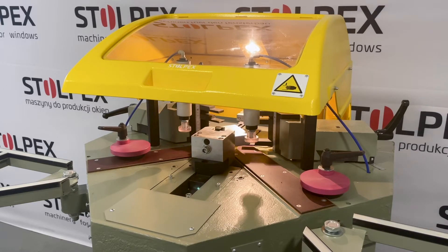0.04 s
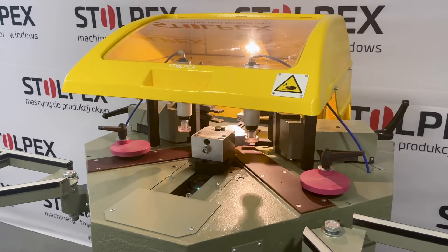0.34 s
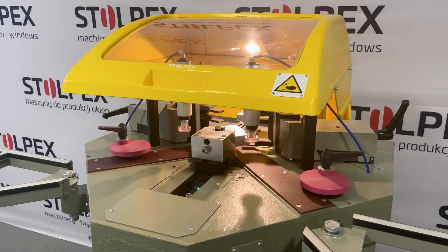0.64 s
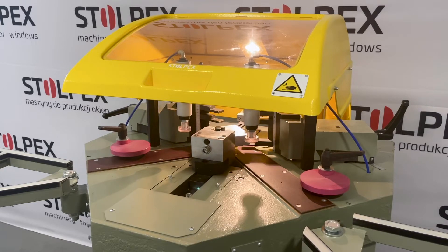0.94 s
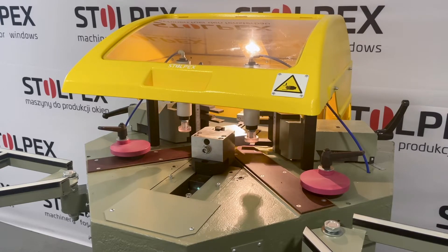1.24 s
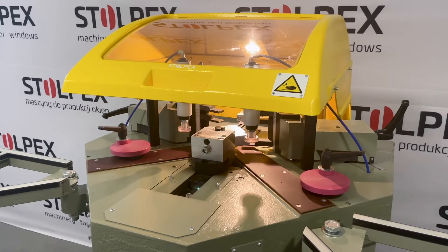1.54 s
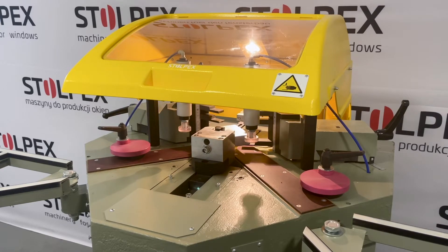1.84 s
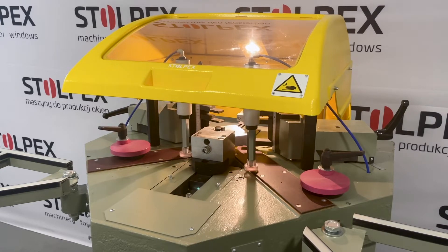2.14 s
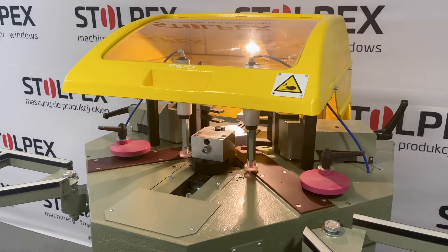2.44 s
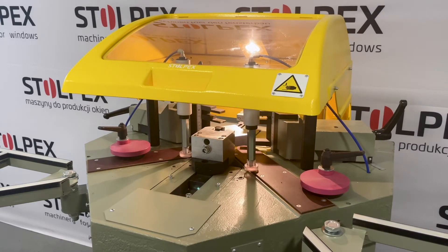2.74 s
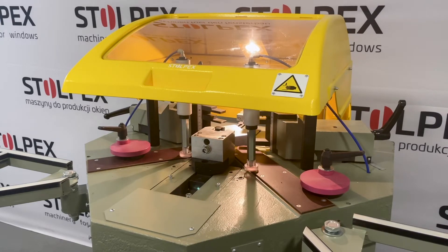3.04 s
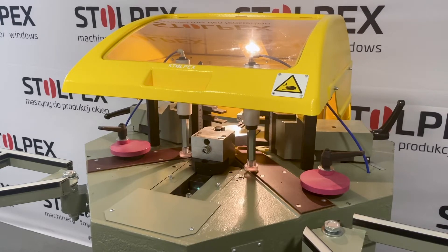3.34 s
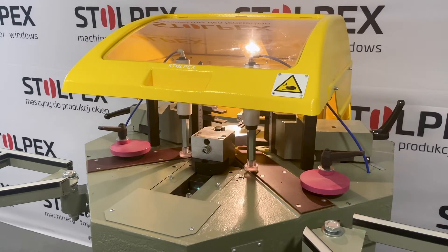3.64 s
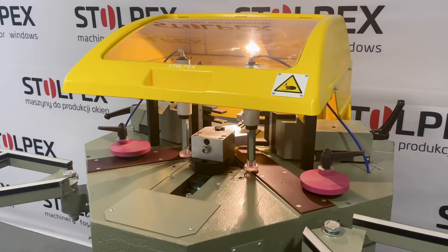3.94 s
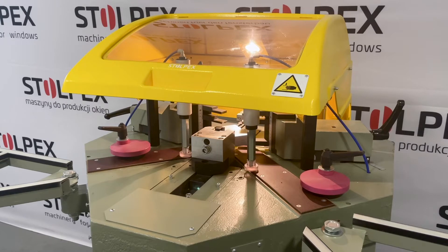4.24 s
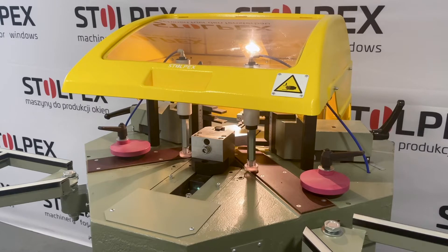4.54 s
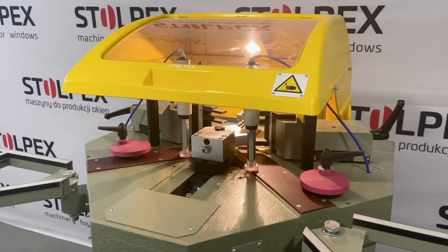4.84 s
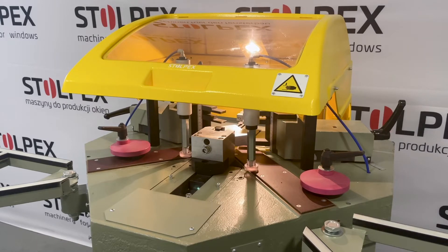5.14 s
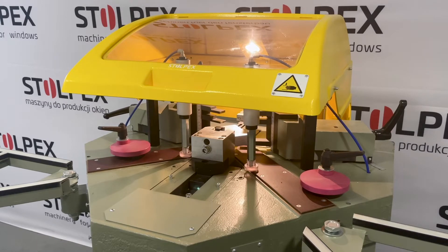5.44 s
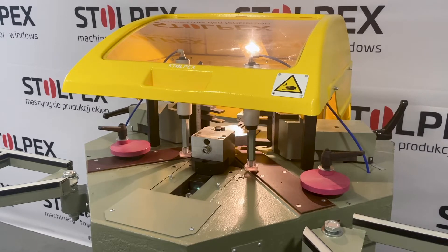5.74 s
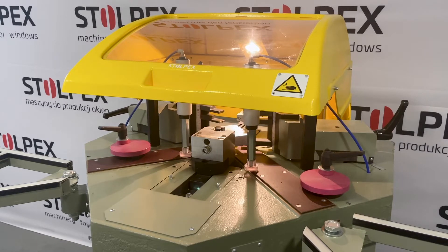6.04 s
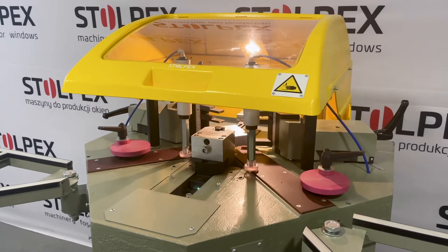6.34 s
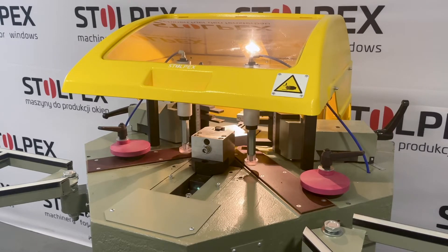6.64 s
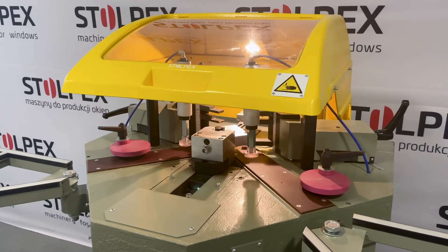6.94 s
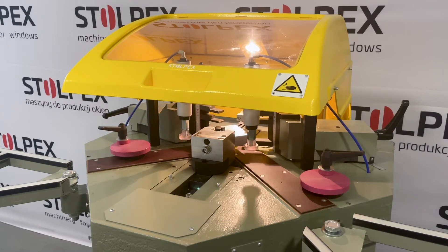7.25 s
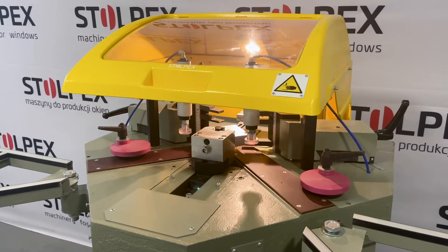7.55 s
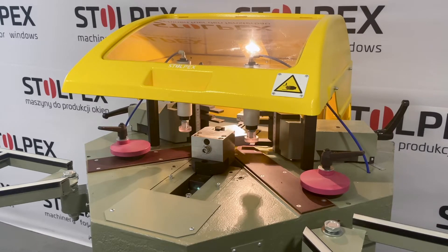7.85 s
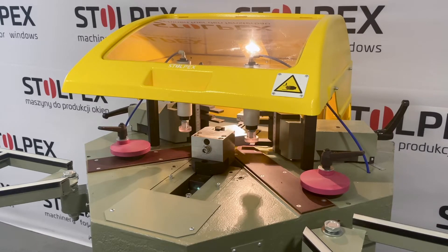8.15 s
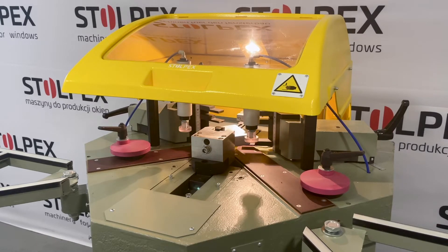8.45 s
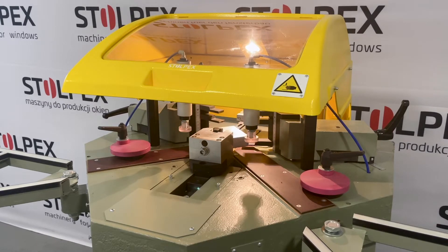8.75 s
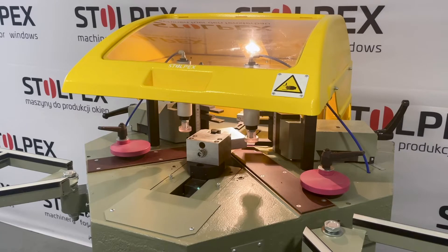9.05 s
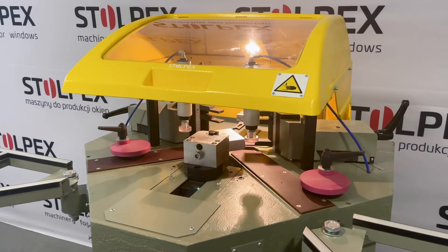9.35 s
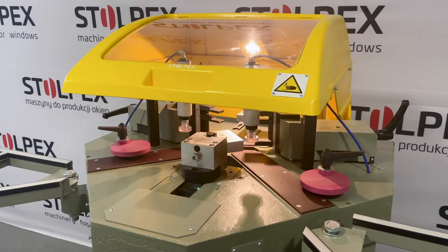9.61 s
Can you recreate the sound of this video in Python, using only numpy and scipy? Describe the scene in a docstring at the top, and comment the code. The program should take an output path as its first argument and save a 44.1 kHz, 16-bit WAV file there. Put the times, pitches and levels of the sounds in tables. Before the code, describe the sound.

An air-powered crimping machine runs one cycle, heard from a step away in a slightly echoing room, over a faint low hum. Soft metal sliding and a knock come around 1 second, then valve clicks. At 1.7 seconds a heavy clunk starts a loud blast of hissing air, which steps down at 2.7 and fades from about 3.4 seconds. After a short lull, a click and another clunk at 4.7 seconds launch a brighter, sizzling blast lasting about a second. At 5.8 seconds a jolt and a sharp puff lead into a softer, thin, high hiss that dies away past 7 seconds. A soft thud follows at 7.7. Around 8.2 seconds a valve clicks and a smaller clunk comes with a short burst of air. Steel slides faintly, with a light clack at 9 seconds and a weaker one at 9.4.

```python
"""An air-powered corner crimping machine

One cycle in a showroom, heard from a step away: clamps down, crimp, release, clamps up, stop back.
Valves click, then cylinders start with a clunk and let out their air in long hissing blasts.
Clamps and knives work in pairs, so their hiss steps down when the first cylinder reaches its end.
Metal parts knock and slide between the blasts; a low hum and a faint hiss lie under it all."""
import sys
import numpy as np
from scipy import signal
from scipy.fft import rfft, irfft, next_fast_len
from scipy.io import wavfile

SR = 44100
rng = np.random.default_rng(int(sys.argv[2]) if len(sys.argv) > 2 else 0)


def waveform_to_disk(signal):
    """Save audio, clipped to [-1, 1], as 16-bit WAV at the path in sys.argv[1]."""
    frames = np.transpose(np.atleast_2d(signal))
    scaled = np.clip(frames, -1, 1) * 32767
    samples = np.round(scaled).astype(np.int16)
    wavfile.write(sys.argv[1], SR, samples)


N = 426888
TIME = np.arange(N) / SR
SIZE = next_fast_len(N + SR)   # a spare second leaves room for the echo
HZ = np.maximum(np.arange(SIZE // 2 + 1) * SR / SIZE, 1)
CUTOFF_HZ = 15800


def from_db(db):
    """Turn decibels into a gain to multiply by."""
    return 10 ** (np.asarray(db) / 20)


def at_hz(points, hz=HZ):
    """Read a table between its rows, with every octave equally wide."""
    pitches, values = np.transpose(points)
    return np.interp(np.log(hz), np.log(pitches), values)


def unit_power(x):
    """Scale a signal to an average power of one."""
    return x / np.sqrt(np.mean(x ** 2) + 1e-30)


def boosts(resonances):
    """How many decibels a set of resonances adds at each pitch."""
    return sum(db / (1 + (2 * (HZ - hz) / width) ** 2) for hz, width, db in resonances)


# How alike left and right are (1 the same, -1 opposite): pitch_hz, likeness
LIKENESS = [(130, .97), (200, .88), (330, .6), (900, .65), (1400, .35), (4000, .55), (6300, .52),
            (7100, -.1), (7700, -1), (8800, -1), (9200, -.4), (10000, .1), (10700, 1), (12500, 1),
            (13200, -.1), (14100, -1)]
# How much louder the left side is: pitch_hz, left_minus_right_db
BALANCE = [(100, 1.7), (500, 1.3), (1400, 0), (2500, 2.8), (5200, 4), (7000, 1), (7700, 0)]
def stereo_spectrum(colour_db):
    """Noise spectrum for left and right, which in the treble turn alike, then opposite, band by band."""
    middle, side = rfft(rng.standard_normal((2, SIZE)))
    alike = np.clip(at_hz(LIKENESS), -1, 1)
    sign = np.array([[1], [-1]])
    pair = np.sqrt(1 + alike) * middle + np.sqrt(1 - alike) * side * sign
    return pair * from_db(colour_db + sign * at_hz(BALANCE) / 2) * (HZ < CUTOFF_HZ)


def noise(colour, resonances=()):
    """Stereo noise; its colour says how strong each pitch is compared with the others."""
    spectrum = stereo_spectrum(at_hz(colour) + boosts(resonances))
    return unit_power(irfft(spectrum)[:, :N])


def held(start_s, length_s, level_db, rise_s, fade_s, surge_db=0, settle_s=0.33):
    """A gain that rises, settles and dies away. Everywhere, fade_s is the time to fall by 60 dB."""
    age = np.maximum(TIME - start_s, 0)
    fade_db = np.minimum(60 * np.maximum(age - length_s, 0) / fade_s, 200)
    onset = 1 - np.exp(-age / rise_s)
    return onset * from_db(level_db + surge_db * np.exp(-age / settle_s) - fade_db)


def blow(start_s, level_db, rise_s, fade_s):
    """The gain of one blow, which builds up and dies at once."""
    fade_db = np.clip(60 * (TIME - start_s - rise_s) / fade_s, 0, 200)
    return np.clip((TIME - start_s) / rise_s, 0, 1) * from_db(level_db - fade_db)


def one_second(start_s):
    """The samples of the second after a hit, and their age in seconds."""
    span = slice(int(start_s * SR), min(int(start_s * SR) + SR, N))
    return span, TIME[span] - TIME[span][0]


def strikes(hits, notes, colour, crack_db, crack_fade_s, ring_offset_db, treble_offset_db, favour_db):
    """Each hit cracks and rings the part; where it lands decides which notes sound and how long."""
    split_hz, contact_s = 2500, .0007
    dull = signal.sosfilt(signal.butter(2, split_hz, fs=SR, output="sos"), noise(colour))
    bright = signal.sosfilt(signal.butter(2, split_hz, "high", fs=SR, output="sos"), noise(colour))
    hz, note_db, fade_s = np.transpose(notes)[:, :, None]
    out = np.zeros((2, N))
    for start_s, level_db, treble_db, ring_db, favoured_hz, fade_factor in hits:
        span, age = one_second(start_s)
        bright_db = treble_db + treble_offset_db
        crack = dull[:, span] + from_db(bright_db) * bright[:, span]
        crack *= from_db(crack_db - 60 * age / crack_fade_s)
        nearness = np.exp(-(np.log2(hz / favoured_hz) / .35) ** 2)
        contact_db = favour_db * nearness + bright_db / (1 + (split_hz / hz) ** 4)
        strengths = from_db(ring_db + ring_offset_db + note_db + contact_db + rng.normal(0, 1, hz.shape))
        rings = strengths * from_db(-60 * age / (fade_s * fade_factor)) * np.sin(2 * np.pi * hz * age)
        onset = 1 - np.exp(-age / contact_s)
        out[:, span] += from_db(level_db) * (crack + rings.sum(axis=0)) * onset
    # small parts give off no bass
    return signal.sosfilt(signal.butter(5, 440, "high", fs=SR, output="sos"), out)


# Colours of the room's rumble and hiss: pitch_hz, level_db
RUMBLE_COLOUR = [(20, -22.5), (35, -10), (52, -0.5), (75, -3), (110, -6.5), (160, -18.5), (250, -22),
                 (500, -37.5), (1500, -58.5)]
HISS_COLOUR = [(200, -1), (500, -2.5), (900, -16), (1300, -8.5), (2700, -17.5), (6000, -10.5),
               (10000, -4.5), (15500, 1.5)]
# Mains hum, compared with the rumble: pitch_hz, level_db
HUM_NOTES = [(50, -2), (100, -5.5)]
def background(recovery_s=10):
    """Rumble, mains hum and hiss all sink as the first blast begins, then creep back."""
    age = TIME - CLUNKS[0][0]
    dip = (age > 0) * np.exp(-np.abs(age) / recovery_s)
    hum = sum(from_db(db) * np.sqrt(2) * np.sin(2 * np.pi * (hz * TIME + rng.random()))
              for hz, db in HUM_NOTES)
    rumble = from_db(-61.5 - 6.5 * dip) * (noise(RUMBLE_COLOUR) + hum)
    hiss = from_db(-64 - 9 * dip) * noise(HISS_COLOUR)
    return rumble + hiss


# Knocks in the frame: start_s, level_db, treble_db, ring_db, favoured_hz, fade_factor
KNOCKS = [(0.329, -46.5, -38, 14, 716, 0.33), (0.970, -31, -30, 8, 1350, 0.19),
          (0.974, -30, -34, 14, 500, 0.16), (1.606, -42, -35, 12.5, 550, 0.24),
          (1.660, -40, -31, 20, 580, 0.25), (1.674, -35, -34.5, 14, 550, 0.4),
          (1.724, -17, -27.5, 14, 874, 0.14), (4.526, -61, -43, 13.5, 530, .25),
          (4.673, -26, -28, 21.5, 760, 0.3), (5.773, -39, -15, 3, 696, 0.51),
          (6.793, -39.5, -30, 14.5, 640, 0.34), (6.809, -44, -30, 15, 640, 0.39),
          (7.385, -50.5, -32, 14.5, 558, 0.34), (7.398, -53.5, -32, 12, 555, 0.38),
          (8.176, -39, -19, 9, 611, 0.27), (8.226, -39, -22, 11, 802, 0.36)]
# Notes the frame rings at: pitch_hz, level_db, fade_s
FRAME_NOTES = [(465, -3.5, 0.11), (500, 3, .11), (525, -4, 0.42), (620, -2, 0.11), (730, -4, .12),
               (840, -6, 0.4), (1235, -10, .2), (1319, -7, 0.25), (1500, -14.5, .2), (1723, -15, 0.2),
               (2030, -10, .2), (2660, -14, 0.25), (3080, -15, .25), (4016, -21, .25)]
# Colour of a knock's crack: pitch_hz, level_db
FRAME_CRACK = [(200, -26.5), (410, -10), (480, 5), (680, 5), (830, 7), (1050, -6.5), (1350, 3.5),
               (1800, -4.5), (3200, -7.5), (5000, -19), (15000, -22.5)]
def frame_knocks():
    """Metal parts run into their stops and make the frame ring."""
    return strikes(KNOCKS, FRAME_NOTES, FRAME_CRACK, crack_db=-6.5, crack_fade_s=0.057,
                   ring_offset_db=-23.5, treble_offset_db=22.5, favour_db=7)


# Parts sliding on the table: start_s, length_s, drone_db, swish_db, rise_s
SLIDES = [(0.434, 0.36, -66.5, -81, 0.023), (0.758, 0.35, -63.5, -67.5, 0.055),
          (1.37, 0.2, -61, -66, 0.026), (4.453, .06, -72, -81.5, 0.025), (4.508, 0.084, -64, -79.5, 0.01),
          (7.447, 0.35, -75.5, -69.5, 0.033), (8.83, 0.3, -68, -84.5, 0.031),
          (9.098, 0.42, -76.5, -74, 0.048)]
# Colours of the table's drone and the steel's swish: pitch_hz, level_db
DRONE_COLOUR = [(300, -28), (420, -13.5), (480, 1), (530, -0.5), (600, -7), (720, -19.5), (1000, -38.5)]
SWISH_COLOUR = [(400, -27.5), (800, -2), (1400, 1.5), (1800, -6), (2500, -4.5), (3000, -9.5), (4300, -12),
                (8000, -19)]
# Where the rubbed steel sings: pitch_hz, width_hz, boost_db
STEEL_RESONANCES = [(1050, 9, 14), (1330, 10, 12.5), (1820, 40, 13.5), (2640, 90, 4)]
def slides(fade_s=0.37):
    """Steel swishes slowly over the table, which drones at its lowest notes."""
    drone = swish = 0
    for start_s, length_s, drone_db, swish_db, rise_s in SLIDES:
        drone += held(start_s, length_s, drone_db, rise_s, fade_s)
        swish += held(start_s, length_s, swish_db, rise_s, fade_s)
    return drone * noise(DRONE_COLOUR) + swish * noise(SWISH_COLOUR, STEEL_RESONANCES)


# Valves switching: start_s, level_db, treble_db, ring_db, favoured_hz, fade_factor
VALVE_CLICKS = [(0.950, -35, -30, 10, 1550, 0.23), (1.595, -35, -15.5, 6.5, 1560, 0.45),
                (1.598, -32, -17.5, 8, 1560, 0.5), (4.513, -63.5, -36, 18, 1310, 0.25),
                (4.56, -58, -26.5, 9, 1450, 0.48), (4.631, -34, -17, 5.5, 1330, 0.53),
                (8.124, -33.5, -18.5, 1.5, 2180, 0.71)]
# Notes a valve rings at: pitch_hz, level_db, fade_s
VALVE_NOTES = [(1150, -10, 0.082), (1320, -1, 0.11), (1391, -3.5, 0.058), (1490, -12.5, 0.15),
               (1850, -10, 0.1), (1950, -9, .15), (1920, -9, .12), (2191, -13, 0.17), (2353, -10.5, 0.14),
               (2814, -8, 0.3), (2980, -9.5, .056), (4020, -21, .3), (4520, -17, .1), (5500, -11.5, .11)]
# Colour of a valve's crack: pitch_hz, level_db
VALVE_CRACK = [(250, -12), (600, -2.5), (1300, -3), (2900, -3), (3800, -10.5), (7000, -9), (15000, -21)]
def valve_clicks():
    """An electromagnet snaps each valve over with a short, ringing click."""
    return strikes(VALVE_CLICKS, VALVE_NOTES, VALVE_CRACK, crack_db=-11.5, crack_fade_s=0.1,
                   ring_offset_db=-18.5, treble_offset_db=18, favour_db=11)


# Air escaping, as a short leak while a valve shifts or as the blast of one cylinder:
# start_s, length_s, level_db, sizzle_offset_db, surge_db, rise_s, fade_s, stroke_name
VENTS = [(1.685, .036, -43.5, -8, 1, .002, .3, "fast clamp"),
         (1.723, 1.015, -26, -7, 5, 0.0054, 0.38, "fast clamp"),
         (1.731, 1.688, -29.5, -10, 11, 0.0016, 0.94, "slow clamp"),
         (4.655, .016, -39.5, 4, -1.5, .001, .3, "crimp"), (4.667, 0.54, -32, -3, 9, 0.013, 0.1, "crimp"),
         (4.735, 0.86, -28.5, 1.2, 0, 0.0076, 1.57, "crimp"),
         (5.768, 0.022, -25, -12, 0.5, 0.0085, 0.75, "release"),
         (5.933, 0.95, -41.5, -12.5, 2, 0.28, 2.02, "lift"),
         (6.9, 0.38, -59.5, -5.5, -1, 0.15, 2.3, "lift"), (8.221, 0.051, -34.5, 0, -1, 0.032, 0.89, "stop")]
def airflow(stroke):
    """Gains for the body and the high sizzle of one stroke's hiss; its vents add up in power."""
    body = sizzle = 1e-16
    for start_s, length_s, level_db, sizzle_offset_db, surge_db, rise_s, fade_s, name in VENTS:
        if name == stroke:
            body += held(start_s, length_s, level_db, rise_s, fade_s, surge_db) ** 2
            # the sizzle dies sooner and surges harder
            sizzle_db = level_db + sizzle_offset_db
            sizzle += held(start_s, length_s, sizzle_db, rise_s, fade_s * 0.71, surge_db * 1.6) ** 2
    return np.sqrt(body), np.sqrt(sizzle)


def hood_ripple(echo_db=-10, fade_s=0.037):
    """Quick echoes between hood and table carve fine, steady peaks into a hiss."""
    age = TIME[:SR // 10]
    echoes = rng.standard_normal(len(age)) * from_db(-60 * age / fade_s) * (age > .004)
    spectrum = rfft(echoes / np.sqrt(np.sum(echoes ** 2)), SIZE)
    return np.abs(1 + from_db(echo_db) * spectrum * HZ / (HZ + 900))   # bass bends around the panels


# The space under the hood, which colours blasts and clunks: pitch_hz, width_hz, boost_db
HOOD_RESONANCES = [(209.5, 20, 12), (367.3, 56, 6), (463, 28, 7.5), (522.6, 50, 3.5), (626, 37, 9),
                   (720, 32, 5.5), (783, 35, 10), (918, 90, 5.5), (980, 25, 7), (1038, 35, 8.5),
                   (1065, 50, -4.5), (1170, 57, 6.5), (1310, 140, 1)]
def air_jet(stroke, colour, outlet, hood_share, split_hz=7500, rush_hz=850, dulling=.7):
    """Swirling air, coloured by outlet and hood; as pressure falls, sizzle gives way to a low rush."""
    body_gain, sizzle_gain = airflow(stroke)
    colour_db = at_hz(colour) + boosts(outlet) + hood_share * boosts(HOOD_RESONANCES)
    jet = stereo_spectrum(colour_db) * hood_ripple()
    low_share = 1 / (1 + (HZ / split_hz) ** 8)
    body = unit_power(irfft(jet * low_share)[:, :N])
    sizzle = unit_power(irfft(jet * (1 - low_share))[:, :N])
    rush = irfft(rfft(body, SIZE) / (1 + (HZ / rush_hz) ** 4))[:, :N]
    slackness = unit_power(body_gain) / unit_power(sizzle_gain)   # grows as the sizzle dies
    return (body + rush * (slackness ** dulling - 1)) * body_gain + sizzle * sizzle_gain


# Colour of each stroke's hiss: pitch_hz, level_db
CLAMP_AIR = [(50, -37), (110, -12), (210, -12.5), (300, -10.5), (500, -9.5), (850, -6), (1400, 0.5),
             (2400, 2), (3800, 2.5), (5200, 1.5), (7000, -3.5), (9500, -5), (12000, -10), (13500, -12),
             (15500, -12)]
CRIMP_AIR = [(50, -19), (110, -4.5), (210, -10), (300, -9), (500, -6.5), (850, -3.5), (1400, -1.5),
             (2400, -0.5), (3800, 0), (5200, 2.5), (7000, 3), (9500, 7.5), (12000, 7), (13500, 6.5),
             (15500, 10.5)]
RELEASE_AIR = [(50, -8), (110, -8), (210, 1.5), (300, -5), (500, -4), (850, -1), (1400, -3), (2400, 0.5),
               (3800, 0), (5200, -2.5), (7000, -7), (9500, -11), (12000, -14), (15500, -19)]
LIFT_AIR = [(50, -40), (110, -4), (210, -10.5), (300, -10), (500, -13.5), (850, -13), (1400, -10.5),
            (2400, -7.5), (3800, -2.5), (5200, -3.5), (7000, -4), (9500, 8), (12000, 15.5), (13500, 19.5),
            (15500, 4)]
STOP_AIR = [(50, -17), (110, -18.5), (210, -6), (300, -13), (500, -10), (850, -17.5), (1400, -9.5),
            (2400, -10), (3800, -7.5), (5200, -9.5), (7000, -13), (9500, -16.5), (12000, -20), (15500, -19)]
# Pipe notes and thin whistles of each outlet's hose and silencer: pitch_hz, width_hz, boost_db
FAST_CLAMP_OUTLET = [(927, 20, 4), (1780, 180, 1.5), (2488, 20, 6.5), (2604, 30, 4), (2782, 27, 7.5),
                     (3080, 20, 4), (3410, 39, 6.5), (3948, 87, 3.5), (4340, 20, 2.5), (4868, 48, 2.5),
                     (5120, 36, 5), (5350, 28, 8)]
SLOW_CLAMP_OUTLET = [(935, 200, 4.9), (1800, 148, 3.5), (2246, 220, 2), (2680, 87, 4.8), (3100, 44, 4.7),
                     (3970, 83, 6.2), (4183, 118, 4.6), (4690, 43, 4.4), (5150, 25, 6)]
CRIMP_OUTLET = [(247, 25, 5.5), (385, 18, 6.5), (469.5, 6.2, 7.5), (2020, 15, 15), (1990, 90, -6.5),
                (2275, 28, 3.3), (3290, 28, 4), (3680, 25, 6), (3910, 118, 3.5), (4140, 70, 2),
                (4550, 43, -1), (4970, 135, 4.5)]
RELEASE_OUTLET = [(1380, 29, 6.3), (1760, 110, 3.2), (2670, 28, 8.6), (3524, 73, 4.7), (3680, 15, 10),
                  (4587, 19, 9), (5100, 220, 3)]
LIFT_OUTLET = [(483, 28, 6.2), (1480, 47, 3.4), (1800, 41, 4.6), (1936, 34, 10), (2182, 48, 4.7),
               (2400, 120, 4.7), (2630, 16, 14.5), (2753, 41, 4.6), (3150, 35, 5.6), (3420, 28, 5),
               (3460, 38, 5.1), (4400, 30, 4), (4930, 13, 7.2), (4950, 240, 3), (5282, 32, 5.8)]
STOP_OUTLET = [(248, 24, 7.8), (545, 30, 5.8), (710, 59, 5.5), (1540, 26, 7.6), (1800, 94, 5.7),
               (2560, 81, 4.5), (2750, 87, 3.9), (5430, 220, 4)]
def air_blasts():
    """The cylinders let out their air; each outlet lies more or less deep under the hood."""
    return (air_jet("fast clamp", CLAMP_AIR, FAST_CLAMP_OUTLET, hood_share=.8)
            + air_jet("slow clamp", CLAMP_AIR, SLOW_CLAMP_OUTLET, hood_share=1)
            + air_jet("crimp", CRIMP_AIR, CRIMP_OUTLET, hood_share=1)
            + air_jet("release", RELEASE_AIR, RELEASE_OUTLET, hood_share=.44)
            + air_jet("lift", LIFT_AIR, LIFT_OUTLET, hood_share=.94)
            + air_jet("stop", STOP_AIR, STOP_OUTLET, hood_share=.9))


# Pistons jolting the frame: start_s, thump_db, boom_db, clash_db, rise_s, fade_s
CLUNKS = [(1.688, -58, -45, -55, .008, .2), (1.724, -25, -17.5, -14, .012, .1),
          (4.656, -48, -37, -47, .002, .2), (4.674, -28, -28.5, -43, .012, .13),
          (5.768, -38, -34, -35, .006, .24), (8.224, -52, -43, -42, .002, .2),
          (8.243, -35, -33.5, -52, .009, .24), (8.283, -42, -38, -55, .01, .16)]
# The frame's lowest notes: pitch_hz, level_db, fade_s
THUMP_NOTES = [(57, -9.5, 0.35), (73.6, -4.5, 0.48), (112.3, -1.5, 0.38), (142, -1, 0.32),
               (159.6, -8.5, 0.24), (212, -11.5, 0.38), (242, -12.5, 0.22)]
# Colours of the deep boom and the bright clash: pitch_hz, level_db
BOOM_COLOUR = [(35, -17), (65, 5), (130, 2.5), (190, -11.5), (370, -8.5), (520, -9.5), (800, -19),
               (1300, -34.5), (3000, -44.5)]
CLASH_COLOUR = [(200, -25.5), (600, -11), (900, -3), (1400, -14.5), (3500, 2), (7000, -1), (15000, -6)]
def piston_clunks():
    """Each piston shakes the heavy frame into a thump and a boom, and loose steel clashes on top."""
    hz, note_db, note_fade_s = np.transpose(THUMP_NOTES)[:, :, None]
    thump, boom, clash = np.zeros((3, N))
    for start_s, thump_db, boom_db, clash_db, rise_s, fade_s in CLUNKS:
        span, age = one_second(start_s)
        swings = from_db(note_db - 60 * age / note_fade_s) * np.sin(2 * np.pi * hz * age)
        thump[span] += from_db(thump_db) * swings.sum(axis=0) * np.minimum(age / rise_s, 1)
        boom += blow(start_s, boom_db, rise_s, fade_s)
        clash += blow(start_s, clash_db, rise_s / 2, fade_s)
    return (thump + boom * noise(BOOM_COLOUR, HOOD_RESONANCES)
            + clash * noise(CLASH_COLOUR, HOOD_RESONANCES))


# A hum between the first two blasts: start_s, length_s, pitch_hz, climb_hz_per_s, level_db, db_per_s
RISING_HUM = (3.5, 0.5, 56, 9, -63.5, 7)
def rising_hum():
    """A low tone climbs steadily in pitch and strength, then stops."""
    start_s, length_s, pitch_hz, climb_hz_per_s, level_db, db_per_s = RISING_HUM
    age = np.clip(TIME - start_s, 0, length_s)
    tone = np.sin(2 * np.pi * np.cumsum(pitch_hz + climb_hz_per_s * age) / SR)
    return tone * held(start_s, length_s, level_db + db_per_s * age, rise_s=0.036, fade_s=.3)


# The clamps coming home: peak_time_s, level_db, half_length_s
THUDS = [(7.698, -45, 0.018)]
# The thud's notes: pitch_hz, level_db
THUD_NOTES = [(215, -13), (394, -4.5)]
# Colour of its rumble: pitch_hz, level_db
THUD_COLOUR = [(120, -9), (260, -7), (340, -4), (420, -1.5), (500, -11.5), (700, -22.5), (1500, -33)]
def clamp_thud(rumble_db=-10):
    """The clamps land on a cushion: a soft thud, part tone and part rumble, swells and fades."""
    swell = sum(from_db(db) / (1 + ((TIME - peak_time_s) / half_length_s) ** 4)
                for peak_time_s, db, half_length_s in THUDS)
    tone = sum(from_db(db) * np.sin(2 * np.pi * hz * TIME) for hz, db in THUD_NOTES)
    return swell * (tone + from_db(rumble_db) * noise(THUD_COLOUR))


# Hits of the stop block: start_s, level_db, treble_db, ring_db, favoured_hz, fade_factor
STOP_CLACKS = [(8.982, -39, -4.5, 2.5, 1715, 0.36), (9.421, -47.5, -15.5, 1, 540, 0.35)]
# Notes the block rings at: pitch_hz, level_db, fade_s
STOP_NOTES = [(503, -1, 0.24), (660, 0, .14), (848, -9, .35), (1314, -6.5, 0.42), (1603, -3.5, .2),
              (1731, -10, .25), (1755, -9.5, 0.48), (1810, -4, 0.18), (2190, -4, .3), (2300, -11, .25),
              (2800, -7, .26), (3100, -11, .16), (3472, -5, .5), (4016, -12, .17), (4651, -18.5, .3)]
# Colour of the block's crack: pitch_hz, level_db
STOP_CRACK = [(250, 3), (500, 0), (850, 3.5), (1120, -12), (1350, 3), (1750, -4), (2100, -4), (2500, -2.5),
              (3100, 1), (3800, -7), (5200, -14), (6800, -9.5), (15000, -22)]
def stop_clacks():
    """The steel stop block clacks at both ends of its travel."""
    return strikes(STOP_CLACKS, STOP_NOTES, STOP_CRACK, crack_db=-4.5, crack_fade_s=0.13,
                   ring_offset_db=-17.5, treble_offset_db=7, favour_db=11.5)


# How long the showroom echoes: pitch_hz, fade_s
ROOM_FADES = [(100, 0.71), (260, 0.52), (700, 0.9), (1840, .8), (4850, 0.55), (14000, 0.15)]
def showroom_echo(sound, build_s=0.0041):
    """Reflections blur into a tail of noise, and each band of pitches dies at its own rate."""
    age, response = TIME[:SR], 0
    tail = stereo_spectrum(0)
    edges_hz = [0, 200, 500, 1200, 3000, 7000, CUTOFF_HZ]
    for low, high in zip(edges_hz, edges_hz[1:]):
        band = irfft(tail * ((HZ >= low) & (HZ < high)))[:, :SR]
        response += band * from_db(-60 * age / at_hz(ROOM_FADES, (low + high) / 2))
    response *= 1 - np.exp(-age / build_s)
    response = unit_power(response) / np.sqrt(SR)
    return irfft(rfft(sound, SIZE) * rfft(response, SIZE))[:, :N]


def scene():
    """Air, hits and slides over the background; only the hits echo in the showroom."""
    valves = valve_clicks()
    knocks = frame_knocks() + stop_clacks()
    thud = clamp_thud()
    clunks = piston_clunks()
    into_room = (from_db(-1.5) * valves + from_db(-2) * knocks
                 + from_db(-4) * thud + from_db(-13.5) * clunks)
    echo = showroom_echo(into_room.mean(axis=0))
    return air_blasts() + clunks + valves + knocks + thud + echo + slides() + background() + rising_hum()


def record(dry, bass_hz=42):
    """The small microphone loses the deepest bass; the highest treble is cut steeply."""
    thin = signal.sosfilt(signal.butter(2, bass_hz, "high", fs=SR, output="sos"), dry)
    return signal.sosfilt(signal.ellip(12, .1, 80, CUTOFF_HZ, fs=SR, output="sos"), thin)


dry = scene()
out = record(dry)
waveform_to_disk(out)
```